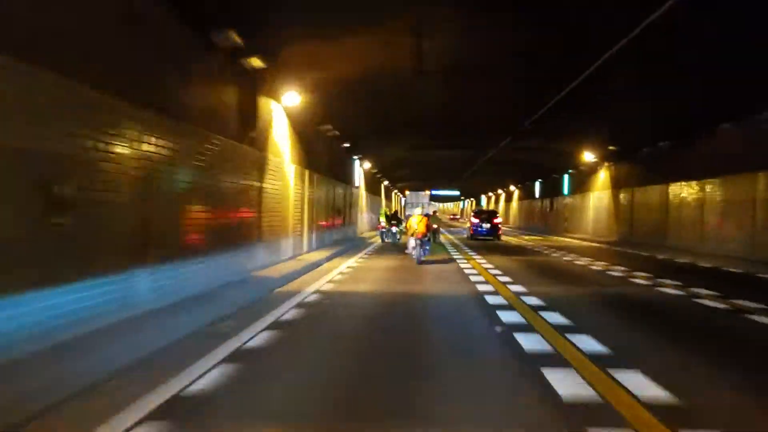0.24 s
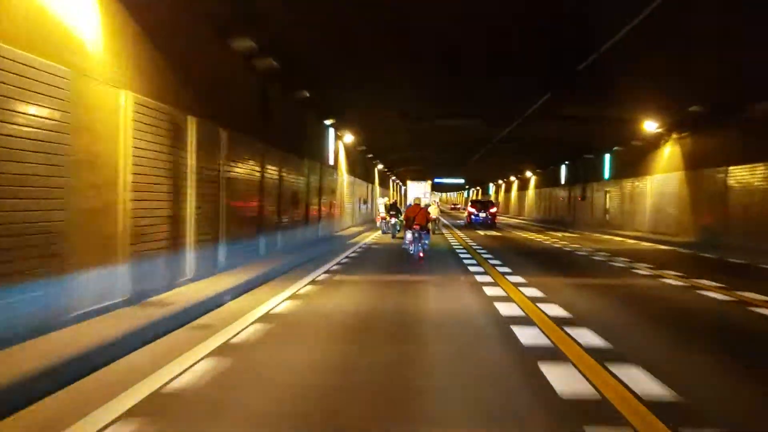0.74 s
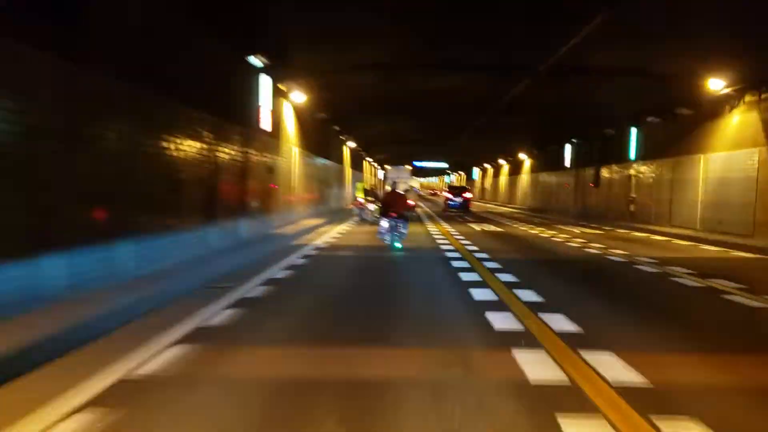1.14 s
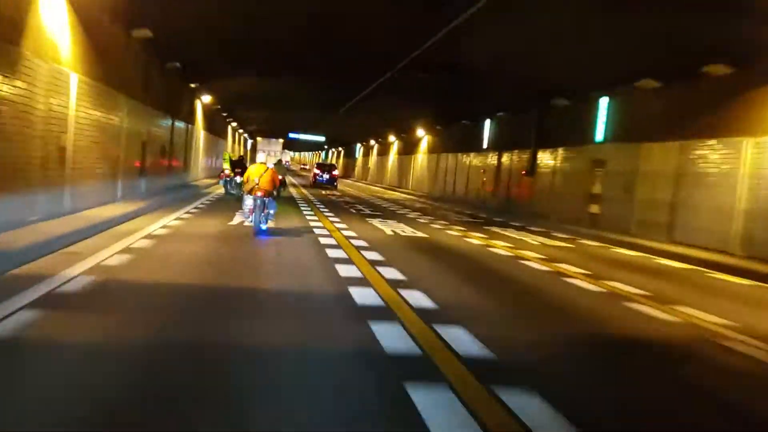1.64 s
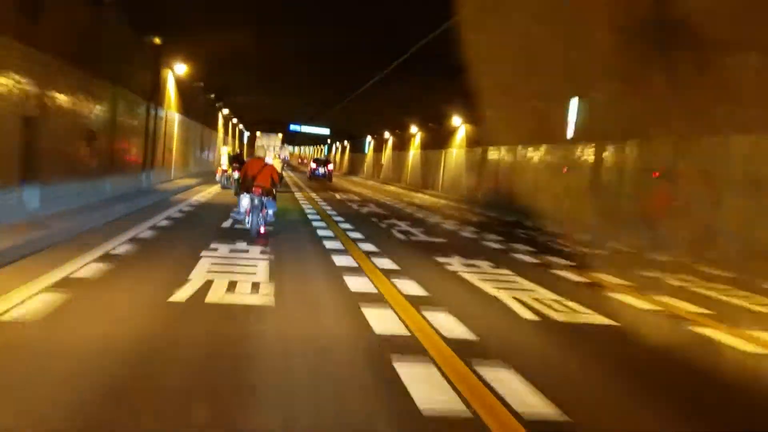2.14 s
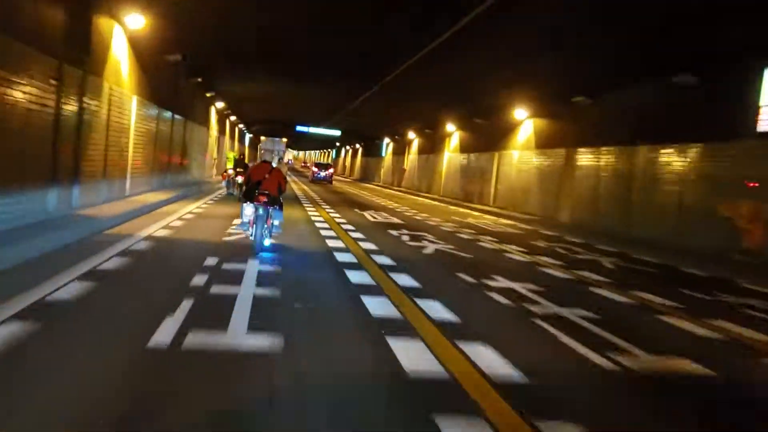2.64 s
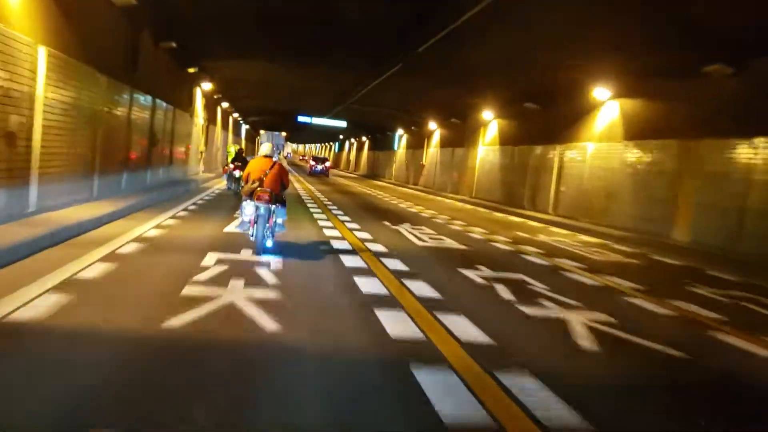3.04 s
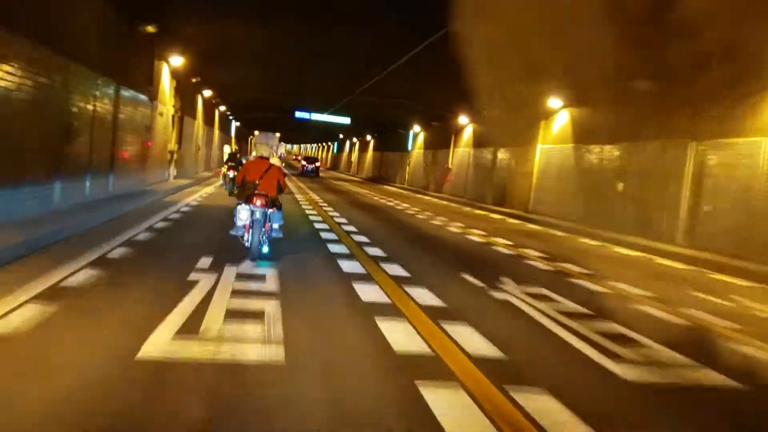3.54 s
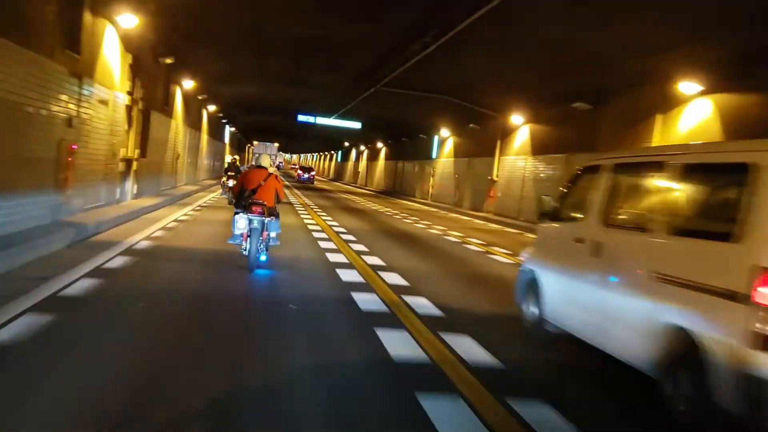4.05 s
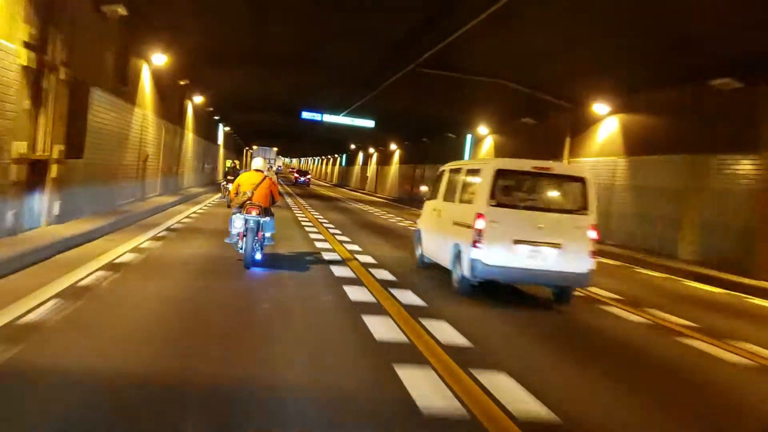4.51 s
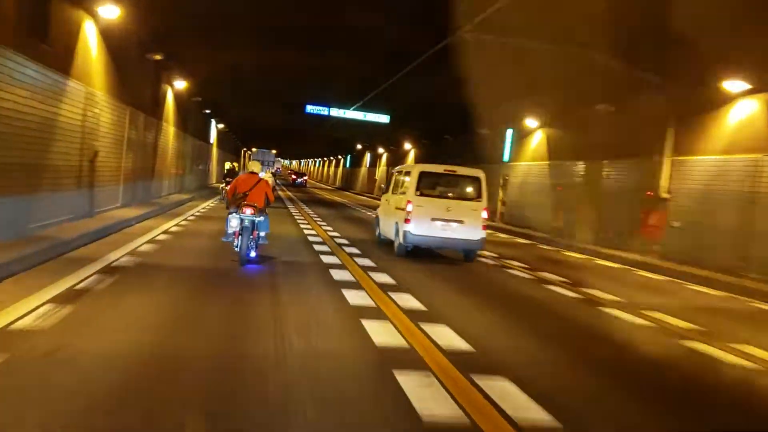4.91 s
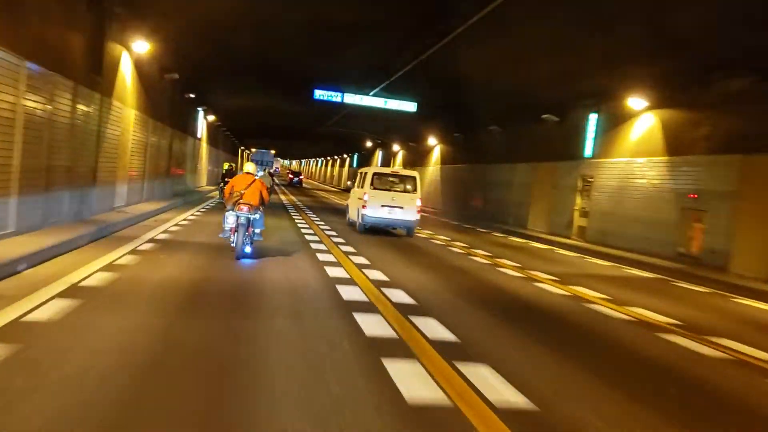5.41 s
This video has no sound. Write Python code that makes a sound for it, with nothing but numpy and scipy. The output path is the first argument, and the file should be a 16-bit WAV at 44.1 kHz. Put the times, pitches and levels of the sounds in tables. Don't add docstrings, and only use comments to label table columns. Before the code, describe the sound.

Muffled, boomy tunnel ride with droning motorcycle engines, a short throttle burst ahead, cloth ticks at the microphone, then a van's hissing tyres passing.

```python
import sys
import numpy as np
from scipy import signal
from scipy.fft import rfft, irfft, next_fast_len
from scipy.io import wavfile
from scipy.ndimage import uniform_filter1d, minimum_filter1d, map_coordinates

SR = 44100
rng = np.random.default_rng(int(sys.argv[2]) if len(sys.argv) > 2 else 0)


def natural_amplitude(level_db):
    exponent = np.asarray(level_db, float) / 20
    return 10 ** exponent


def transcribe(u):
    v = np.clip(np.atleast_2d(u).T, -1, 1)
    q = np.round(v * 32767).astype(np.int16)
    wavfile.write(sys.argv[1], SR, q)


N = 250047
T = np.arange(N) / SR


def unit(x):
    return x / np.sqrt(np.mean(x ** 2) + 1e-20)


def along(points, hz):
    f, v = np.transpose(points)
    return np.interp(np.log(hz + 1), np.log(f + 1), v)


def curves(rows):
    s, *columns = np.transpose(rows)
    return [np.interp(T, s, column) for column in columns]


def bells(rows):
    return sum(height * np.exp(-((T - s) / half) ** 2) for s, height, half in rows)


def swells(rows, floor_db):
    return 20 * np.log10(natural_amplitude(floor_db) + bells([(s, natural_amplitude(db), half) for s, db, half in rows]))


def wobble(rate):
    return map_coordinates(rng.standard_normal(int(N * rate / SR) + 4), [T * rate], order=2)


def filtered(x, response):
    m = next_fast_len(N + 8192)
    return irfft(rfft(x, m) * response(np.fft.rfftfreq(m, 1 / SR)), m)[..., :N]


def rush(spectrum, patchy_db):
    z = signal.stft(rng.standard_normal((2, N)), nperseg=512)[2]
    patches = rng.standard_normal(z.shape[1:])
    patches = uniform_filter1d(patches, size=6, axis=0)
    patches = uniform_filter1d(patches, size=14, axis=1)
    pair = signal.istft(z * natural_amplitude(patchy_db * unit(patches)), nperseg=512)[1][:, :N]
    return unit(filtered(pair, lambda hz: natural_amplitude(along(spectrum, hz))))


def hum(firing_hz, order, db, fade_db, blur):
    turn = 2 * np.pi * np.cumsum(firing_hz) * order / SR
    paths = []
    for path_blur in (blur, 4 * blur):
        drift = path_blur * (wobble(7) + wobble(22) / 2)
        fade = natural_amplitude(fade_db * wobble(11))
        paths.append(fade * np.sin(turn + drift + rng.uniform(0, 2 * np.pi)))
    return np.sqrt(2) * natural_amplitude(db) * np.array(paths)


# (frequency [Hz], left-right correlation [-1 to 1])
PORT_LIKENESS = [(30, 0.995), (60, 1), (180, 0.94), (300, 0.82), (430, 0.85), (600, 0.2), (750, -0.016),
                 (930, -0.61), (1300, -0.21), (2200, 0.052), (9000, -0.67)]
# (frequency [Hz], left minus right [dB])
PORT_BALANCE = [(30, 0), (60, -2.5), (300, -2), (400, -1), (520, -4), (650, 1), (1000, -2.5), (2000, -2.5),
                (3400, -1), (4200, 1), (5800, 8), (7500, 7.5), (9000, 2), (12000, 5), (15000, 0.5)]


def ports(pair):
    def turn(hz):
        return np.arccos(np.clip(along(PORT_LIKENESS, hz), -1, 1)) / 2

    def balance(hz):
        return natural_amplitude(along(PORT_BALANCE, hz) * [[.5], [-.5]])

    mid, side = filtered(pair, lambda hz: [np.cos(turn(hz)), np.sin(turn(hz))])
    return natural_amplitude(-0.92) * filtered(np.array([mid + side, mid - side]), balance)


# (time [s], peak [dB], half length [s])
OWN_SWELLS = [(.2, -40, 0.13), (1.02, -25, 0.13), (1.66, -32.5, 0.21), (1.9, -29.5, 0.13),
              (2.15, -30.5, 0.079), (2.85, -31.5, 0.074), (2.6, -33, 0.14), (3.05, -32, 0.12),
              (3.5, -27.5, 0.13), (3.8, -27, 0.18), (4.15, -36, 0.089), (4.5, -31.5, 0.25), (4.92, -31, .1),
              (5.22, -26.5, 0.13), (5.5, -30, 0.25)]
# (order [per firing], level [dB over order 6])
OWN_ORDERS = [(1, -0.5), (2, -0.5), (3, -12.5), (4, -3.5), (5, -18), (6, -0.5), (8, -11)]


def own_engine():
    firing_hz = np.full(N, 66.73)
    sixth_db = swells(OWN_SWELLS, -34.5)
    return sum(hum(firing_hz, k, sixth_db + db - 3.0, fade_db=2, blur=.4) for k, db in OWN_ORDERS)


# (time [s], firing rate [Hz])
AHEAD_FIRING = [
    (0, 104.4),
    (.9, 103.5),
    (1.2, 105.2),
    (2.2, 106.2),
    (2.45, 102.9),
    (3.2, 86.65),
    (4.3, 84.35),
    (5.67, 81.54),
]
# (time [s], opening [dB over cruising])
AHEAD_THROTTLE = [(0, 2.5), (.55, 1.5), (.85, 0), (1.06, 3), (1.2, 8), (1.35, 9), (1.62, 8.5), (1.8, 5),
                  (1.89, 8), (2.07, 3.5), (2.5, 0.5), (3.0, -1.5), (4.7, -2.5), (5.2, -.5), (5.67, .5)]
# (time [s], peak [dB], half length [s])
FIRST_SWELLS = [(.07, -13.5, 0.068), (.23, -14.5, 0.053), (.36, -19, 0.13), (1.22, -17, 0.082),
                (1.55, -15, 0.079), (1.71, -20, 0.031), (2.02, -23, 0.13), (2.16, -16, 0.097),
                (2.38, -13, 0.06), (2.58, -11, 0.032), (2.85, -18.5, 0.11), (2.98, -19.5, 0.061),
                (3.19, -17.5, 0.058), (3.41, -16.5, 0.065), (4.31, -22.5, 0.058), (4.71, -16.5, 0.052),
                (5.32, -18, 0.066), (5.45, -23, 0.041), (5.6, -15, 0.11)]
SECOND_SWELLS = [(.02, -20.5, 0.024), (.17, -22.5, 0.078), (.33, -27, 0.072), (.55, -20, 0.12),
                 (.76, -22, 0.099), (1.0, -31.5, 0.16), (1.25, -22.5, 0.11), (1.47, -21, 0.12),
                 (1.73, -15, 0.025), (1.97, -22.5, 0.098), (2.18, -22, 0.068), (2.31, -21, 0.039),
                 (2.44, -29, 0.12), (2.7, -32.5, .07), (3.17, -25, 0.089), (3.43, -28.5, 0.061),
                 (3.87, -28.5, 0.14), (4.07, -31.5, 0.054), (4.6, -30, .08), (5.2, -30.5, 0.066),
                 (5.55, -27.5, 0.19)]
# (order [per firing], level [dB])
AHEAD_UPPER = [(5.5, -17.5), (6.5, -11), (7, -12.5), (8, -19.5), (9, -19.5), (9.6, -24), (10, -23.5),
               (12.5, -21), (18, -22.5)]
MIDDLE_DB = (-13.5, -8, -4.5, -4.5, -14, -12)
# (time [s], peak [dB], half length [s])
MIDDLE_SWELLS = [
    [(.35, -37, 0.053), (1.08, -26, 0.07), (1.4, -33.5, 0.07), (2.5, -28.5, 0.093)],
    [(1.1, -21.5, 0.055), (1.3, -22.5, 0.086), (1.5, -27.5, .06), (1.7, -26, 0.052), (1.97, -26.5, 0.087),
     (.45, -30, .08)],
    [(1.2, -24, 0.069), (1.47, -23, 0.091), (1.68, -20, 0.055), (1.9, -28.5, 0.044), (2.25, -31, 0.071)],
    [(1.17, -25.5, .06), (1.32, -23, 0.084), (1.45, -25.5, 0.024), (1.56, -31, 0.035), (1.75, -33, 0.053),
     (1.97, -30.5, 0.039), (2.1, -26.5, 0.037), (2.22, -37, .05), (.2, -39.5, 0.057), (.75, -42.5, 0.15)],
    [(1.2, -34, 0.06), (1.32, -37.5, 0.043), (1.58, -30, 0.092), (1.81, -28, 0.042), (1.9, -36, 0.025),
     (2.12, -40, 0.057)],
    [(2.92, -26, .06), (3.05, -25.5, 0.047), (4.55, -29, 0.068), (5.4, -30, 0.019), (5.55, -23.5, 0.11)],
]
# (frequency [Hz], density [dB per Hz])
HISS = [(450, -36), (750, -4.5), (926, 4.5), (1120, -0.5), (1440, -3.5), (1900, -10), (2400, -14),
        (3000, -20.5), (3900, -45), (6000, -120)]


def bike_ahead():
    firing_hz = curves(AHEAD_FIRING)[0] * (1 + 0.00906 * wobble(8))
    upper_db = -43.5 + 1.88 * curves(AHEAD_THROTTLE)[0]
    first_db = swells(FIRST_SWELLS, -34.5) - .1
    second_db = swells(SECOND_SWELLS, -36.5) - .2
    sound = hum(firing_hz, 0.99, first_db, fade_db=1.2, blur=.5)
    sound += hum(firing_hz, 2, second_db, fade_db=2.2, blur=.8)
    for order, db in AHEAD_UPPER:
        sound += hum(firing_hz, order, upper_db + db, fade_db=2.5, blur=.7)
    for order, rows, db in zip((2.5, 3, 4, 5, 6, 3.5), MIDDLE_SWELLS, MIDDLE_DB):
        sound += hum(firing_hz, order, swells(rows, upper_db + db) - 1, fade_db=1.8, blur=.55)
    gate = (1 + np.cos(2 * np.pi * np.cumsum(firing_hz) / SR)) ** 3 / 4
    return sound + natural_amplitude(upper_db - 25) * gate * rush(HISS, patchy_db=.5)


def effort():
    van_db = curves(VAN_PASS)[1] + 3
    return 10 * np.log10(natural_amplitude(curves(AHEAD_THROTTLE)[0]) ** 2 + natural_amplitude(van_db) ** 2)


# (time [s], change [dB], half length [s])
HEADWIND = [
    (0.552, -2.5, 0.082),
    (0.759, 1.5, 0.045),
    (2.054, -3.5, 0.097),
    (4.59, 1, 0.12),
]


def headwind():
    return bells(HEADWIND)


# (frequency [Hz], density [dB per Hz])
BOOM = [(12, -48.5), (25, -13.5), (40, -10.5), (57, 0), (70, -9.5), (90, 1), (110, 0), (135, -6),
        (150, -6.5), (175, -7.5), (220, -14), (290, -39.5), (480, -120)]
ROAR = [(94, -34.5), (160, -7.5), (211, -2), (323, -3), (365, -7.5), (409, -4), (466, -9), (527, -9.5),
        (640, -15), (730, -19.5), (900, -24), (1170, -68.5), (1980, -120)]
FIZZ = [(1800, -60), (2600, -3), (3300, -0.5), (4400, -3.5), (5000, -8), (6000, -11.5), (6900, -16.5),
        (7500, -12), (8100, -18), (8600, -28), (9500, -31), (15500, -32), (17000, -120)]


def road():
    push = effort()
    gust = wobble(5.0)
    boom_db = -19.5 + 0.38 * push - 1.0
    roar_db = -22 + 0.29 * push - 0.5
    hiss_db = -46.5 + 1.066 * push + 4.5 + .2 * gust
    dull_rubs = [(s, dull_db, half) for s, _, half, dull_db in CLOTH_RUBS]
    fizz_db = swells(dull_rubs, -63.5 + 1.48 * push + 0.35 * headwind())
    fizz_db = fizz_db + 3.5 + 0.65 * gust + 0.27 * wobble(33)
    sound = natural_amplitude(boom_db) * rush(BOOM, patchy_db=-0.5)
    sound += natural_amplitude(roar_db) * rush(ROAR, patchy_db=1.0)
    sound += natural_amplitude(hiss_db) * rush(HISS, patchy_db=.5)
    return sound + natural_amplitude(fizz_db) * rush(FIZZ, patchy_db=0.5)


# (time [s], peak [dB], half length [s], dull part [dB])
CLOTH_RUBS = [(0.039, -73, .04, -65.5), (0.099, -57, .035, -55), (0.191, -68, .035, -75),
              (0.357, -75, 0.041, -70), (.45, -84.5, 0.025, -63.5), (0.63, -87, .04, -78),
              (0.851, -78, 0.044, -70.5), (1.32, -65, 0.077, -59), (1.902, -81.5, 0.033, -63.5),
              (2.385, -76.5, 0.032, -66.5), (2.689, -76.5, .02, -68.5), (3.587, -81, 0.026, -71.5),
              (4.15, -84, 0.038, -82), (4.487, -85, 0.016, -72), (4.764, -88.5, 0.035, -80),
              (5.171, -90.5, 0.022, -68)]
# (frequency [Hz], density [dB per Hz])
WEAVE = [(3000, -60), (6000, -9), (7500, 2.5), (8600, -2.5), (11000, -4), (12000, 0), (13500, -2.5),
         (15500, 1), (17000, -120)]
# (time [s], peak [dB], pitch [Hz], left minus right [dB], length [cycles])
TICKS = [(0.068, -39, 3980, 5, 0.7), (0.244, -46.5, 7330, -12, 1.6), (0.2441, -52, 12500, -8, .6),
         (0.335, -56, 6500, 0, .8), (0.371, -57, 7500, 0, 1.2), (0.443, -56, 6500, 2, .8),
         (1.2714, -46, 12100, 1.5, .8), (1.2969, -47.5, 12440, -.7, .8), (1.3374, -40, 11720, -7.5, 3.2),
         (1.3739, -23.5, 2400, -16, 0.48), (1.3735, -35, 4816, -9, .9), (1.3738, -43, 7460, -8, 1.3),
         (1.3808, -17, 1300, -12.5, 0.34), (1.3810, -38, 5500, -10.5, 0.64),
         (1.3799, -45.5, 12000, -9.5, 3.3), (1.3855, -38, 2801, 2.5, 1.5), (1.6204, -52.5, 10800, -1.5, .8),
         (1.816, -57, 11700, 5.5, 4), (1.8367, -30.5, 7020, 9, 0.92), (1.8369, -35, 12500, 14, .8),
         (1.8364, -36.5, 4600, 15, 1.1), (1.8708, -58, 11800, 5, 2.4), (2.1385, -49, 11000, 1.5, .8),
         (2.6900, -63, 12300, 8, 9)]
# (time [s], peak [dB], left minus right [dB])
FAINT_TICKS = [(0.3331, -62, -2), (0.442, -64, 3.0), (0.7807, -65, -2), (0.85, -65.5, 5),
               (0.9378, -59, 1.5), (1.1598, -60, 4), (1.7046, -54, 10), (1.7434, -55, 17.5),
               (2.1861, -69.5, 5), (2.2508, -72, -4.5), (3.119, -77.5, -5), (3.574, -60.5, -1.5),
               (4.435, -68, 1.0), (4.9551, -70.5, 2)]


def cloth():
    grain = natural_amplitude(2.2 * wobble(150) + 1.2 * wobble(35))
    flutter_db = -90.5 + 1.5 * effort() + headwind()
    rustle_db = swells([rub[:3] for rub in CLOTH_RUBS], flutter_db) + 4.5
    out = natural_amplitude(rustle_db) * unit(grain * rush(WEAVE, patchy_db=1.5))
    t = np.arange(400) / SR
    faint = [(s, db + 0.5, 10500, pan_db, .7) for s, db, pan_db in FAINT_TICKS]
    for s, db, hz, pan_db, cycles in TICKS + faint:
        life = t * hz / cycles
        ring = np.e * life * np.exp(-life) * np.sin(2 * np.pi * hz * t)
        gains = natural_amplitude(db + np.array([[.5], [-.5]]) * pan_db)
        out[:, round(s * SR):][:, :len(t)] += gains * ring
    return out


# (time [s], firing rate [Hz], nearness [dB])
VAN_PASS = [
    (3.0, 101.2, -11.5),
    (3.35, 103, -4),
    (3.67, 105.3, -0.5),
    (4.0, 107, 0.5),
    (4.31, 108.5, 1),
    (4.47, 109.3, -3.5),
    (4.7, 110, -8.5),
    (5.25, 108, -18),
]
VAN_ORDERS_DB = (-30.5, -37, -35, -42.5, -33.5, -42.5)
# (time [s], peak [dB], half length [s])
VAN_SWELLS = [
    [(3.02, -26.5, 0.14), (3.6, -11.5, 0.1), (4.03, -19, 0.043), (4.36, -17, 0.053), (4.6, -17.5, 0.09),
     (5.08, -19.5, 0.069)],
    [(3.47, -26, 0.08), (3.8, -21.5, 0.11), (4.3, -19, 0.12), (4.58, -25.5, 0.14), (4.87, -28, 0.12),
     (5.1, -32.5, .05)],
    [(3.35, -29, 0.068), (3.55, -36, 0.082), (3.82, -26.5, 0.13), (3.98, -25.5, .06), (4.2, -23.5, 0.11),
     (4.35, -28.5, 0.042), (4.8, -33, 0.081)],
    [(3.5, -34, 0.1), (3.75, -33.5, 0.14), (4.0, -31.5, .08), (4.3, -35.5, .1)],
    [(3.5, -28, 0.11), (3.75, -29, 0.042), (4.02, -27.5, 0.057), (4.5, -42, 0.11), (4.9, -27.5, 0.088),
     (5.4, -31, 0.12)],
    [(3.2, -29.5, 0.065), (3.55, -33.5, .08), (3.9, -36, .1), (4.3, -37, 0.12), (4.9, -38, 0.072)],
]


def van():
    firing_hz, near_db = curves(VAN_PASS)
    arrival = np.clip((T - VAN_PASS[0][0]) / 0.13 + .5, 0, 1)
    sound = 0
    for order, rows, db in zip((1, 3, 4, 5.6, 2.5, 5.1), VAN_SWELLS, VAN_ORDERS_DB):
        sound = sound + hum(firing_hz, order, swells(rows, db + near_db / 2) - 3.5, fade_db=3, blur=.9)
    return arrival * sound


# (frequency [Hz], density [dB per Hz])
TREAD = [(900, -39), (1500, -5.5), (2300, 0.5), (3500, -6.5), (5500, -17), (8000, -45), (12000, -120)]


def van_tyres():
    return ports(natural_amplitude(-57 + 1.25 * curves(VAN_PASS)[1]) * rush(TREAD, patchy_db=2.5))


# (time [s], left [full scale], right [full scale], half length [s])
LAST_DIP = (5.67, -.32, -.32, .002)


def last_dip(pair):
    s, *size, half = LAST_DIP
    push = bells([(s, 1, half)])
    return pair * (1 - push) + np.outer(size, push)


def scene():
    tunnel = ports(own_engine() + bike_ahead() + road() + van())
    return last_dip(tunnel + cloth() + van_tyres())


def limited(x, top):
    need = np.minimum(1, top / (np.abs(x).max(axis=0) + 1e-9)) ** .4
    return x * uniform_filter1d(minimum_filter1d(need, size=2600), size=2600)


SKIP = (193788, -.17, -.28)


def skip():
    at, *jump = SKIP
    since = (np.arange(N) - at - .5) / SR
    return np.outer(jump, np.sign(since) * np.exp(-np.abs(since) / 0.0035) / 2)


def low_pass(x):
    return signal.sosfilt(signal.butter(12, 15830, fs=SR, output="sos"), x)


def record(dry):
    mix = limited(dry, top=.92) + skip()
    return low_pass(mix)


dry = scene()
out = record(dry)
transcribe(out)
```